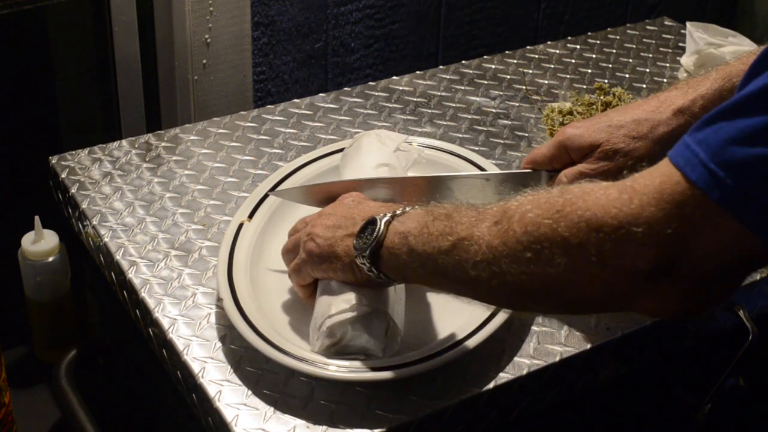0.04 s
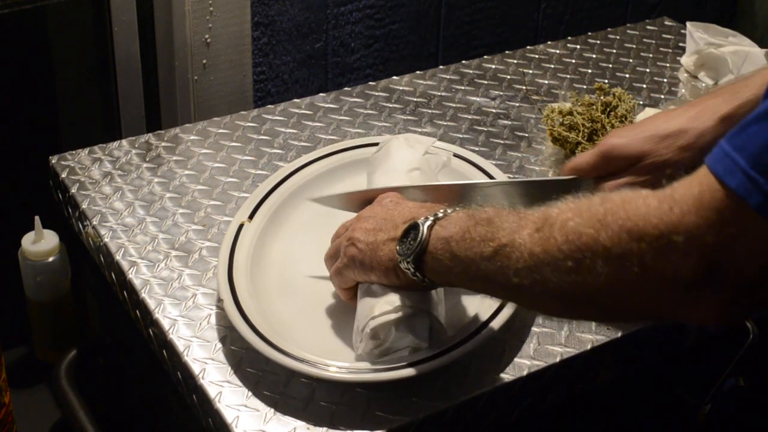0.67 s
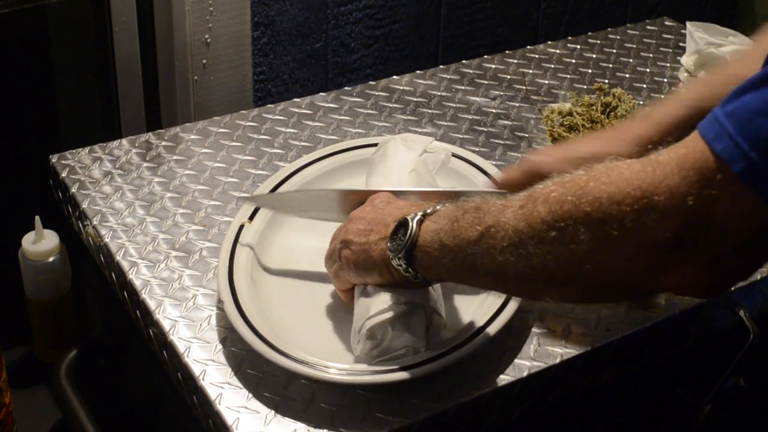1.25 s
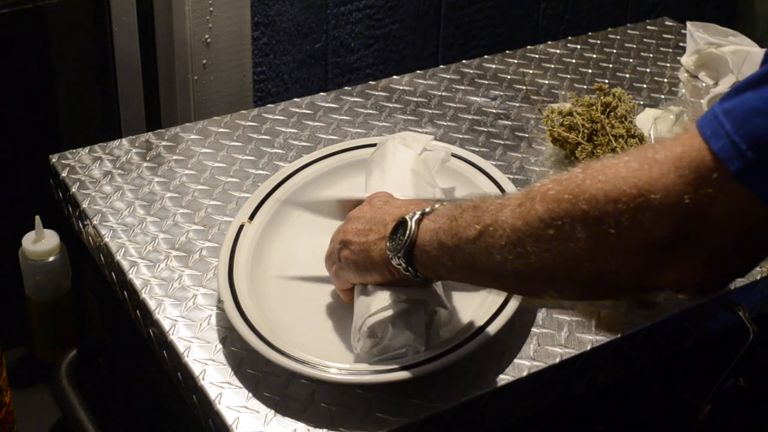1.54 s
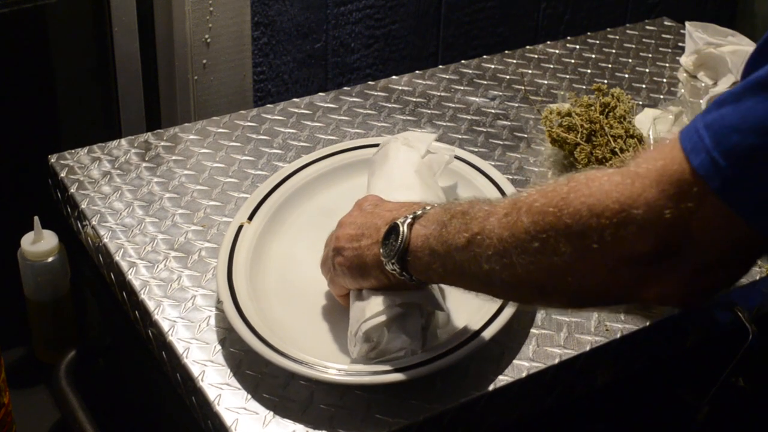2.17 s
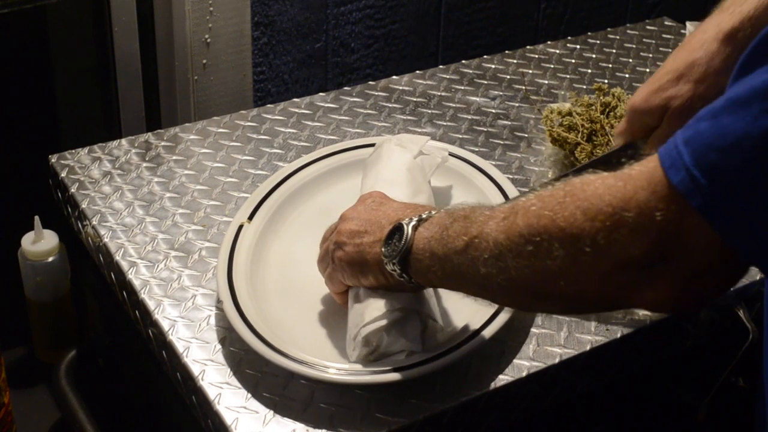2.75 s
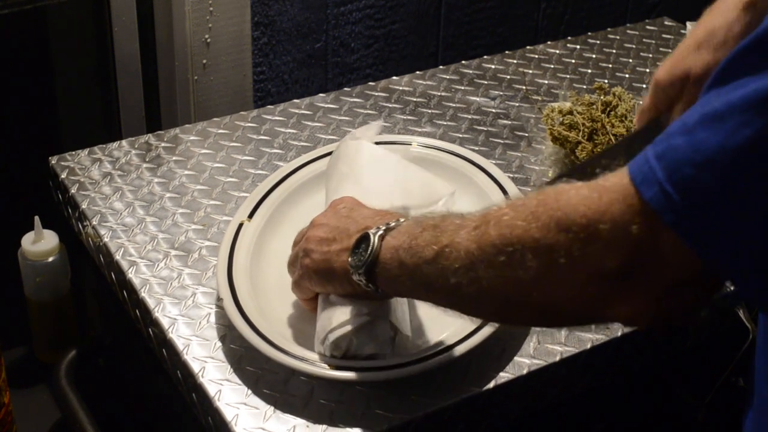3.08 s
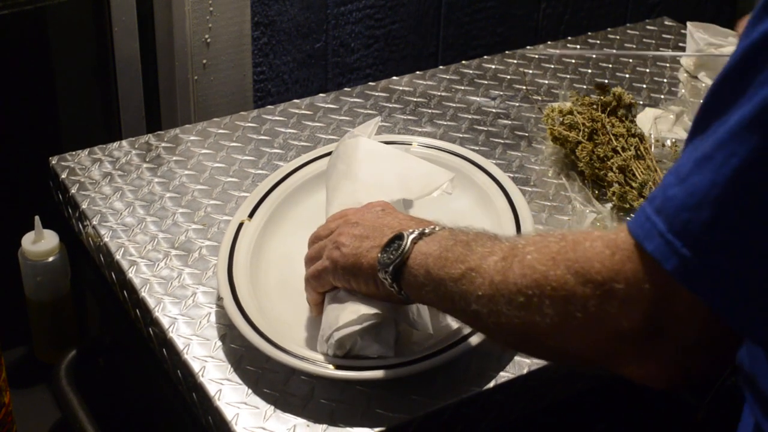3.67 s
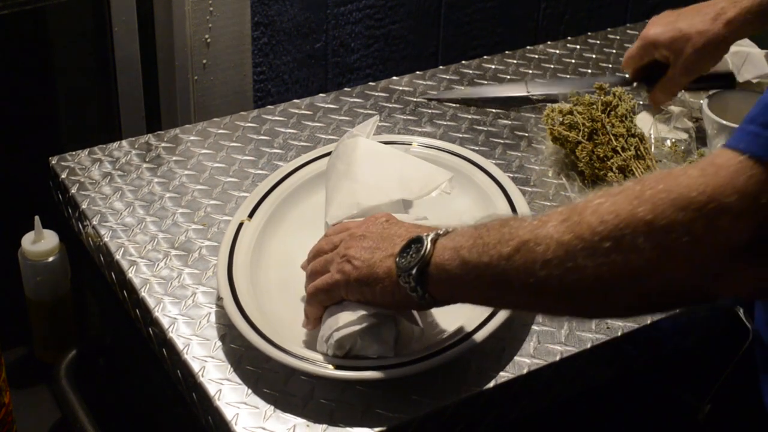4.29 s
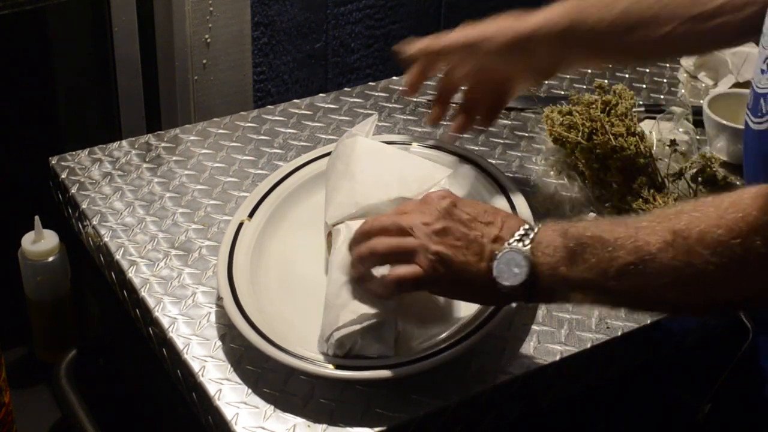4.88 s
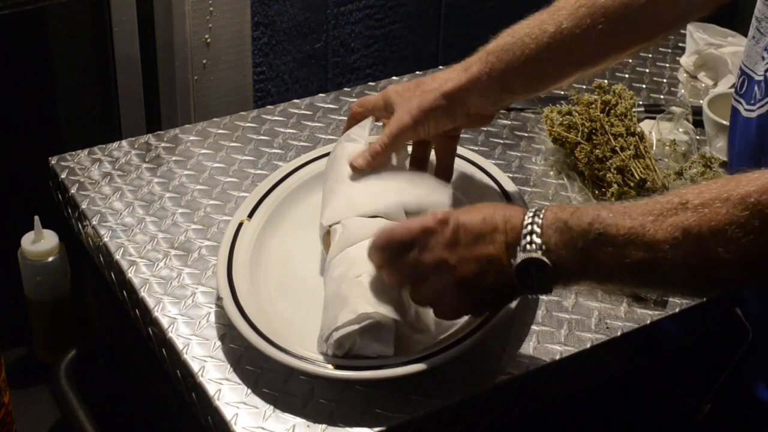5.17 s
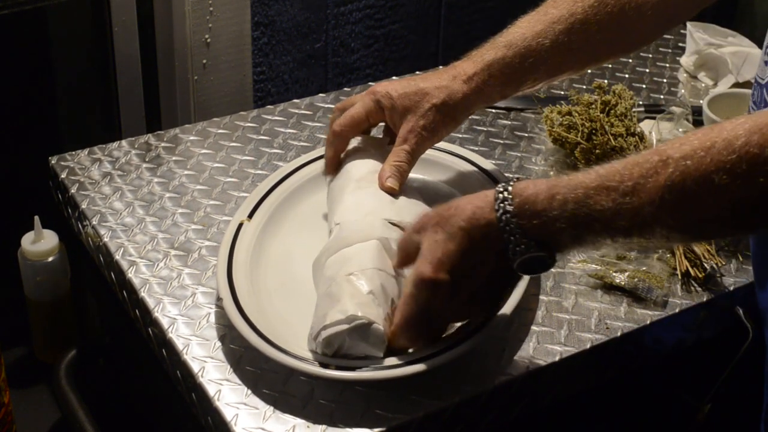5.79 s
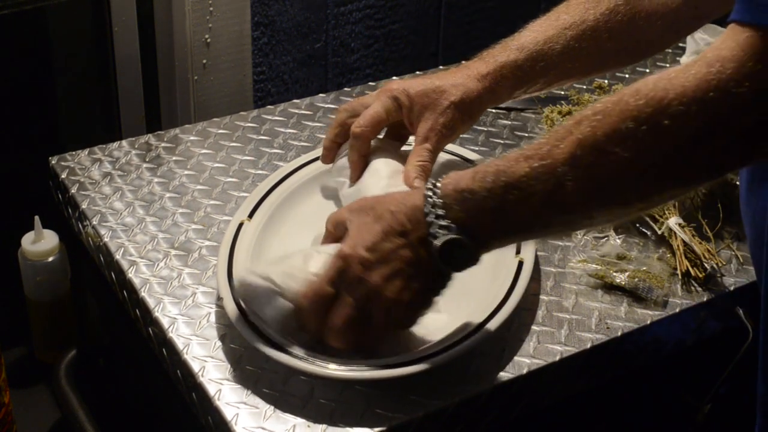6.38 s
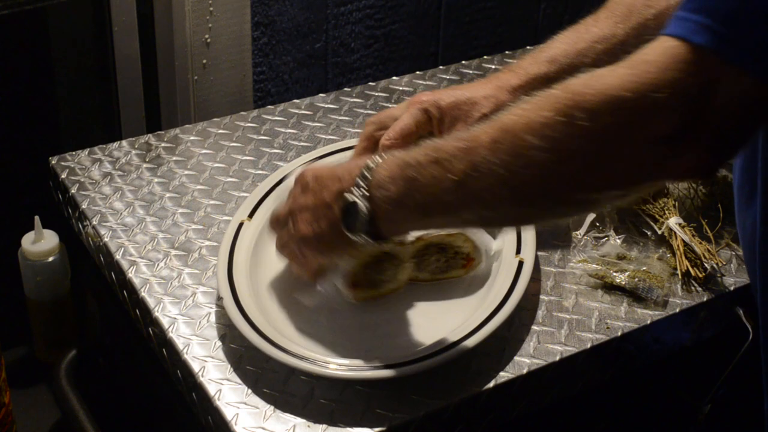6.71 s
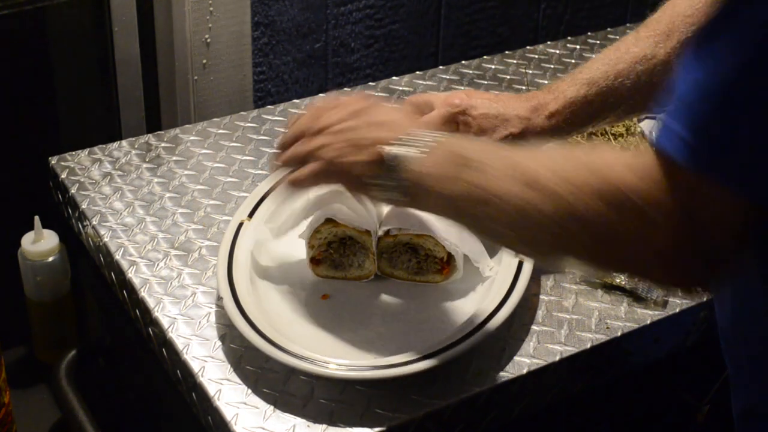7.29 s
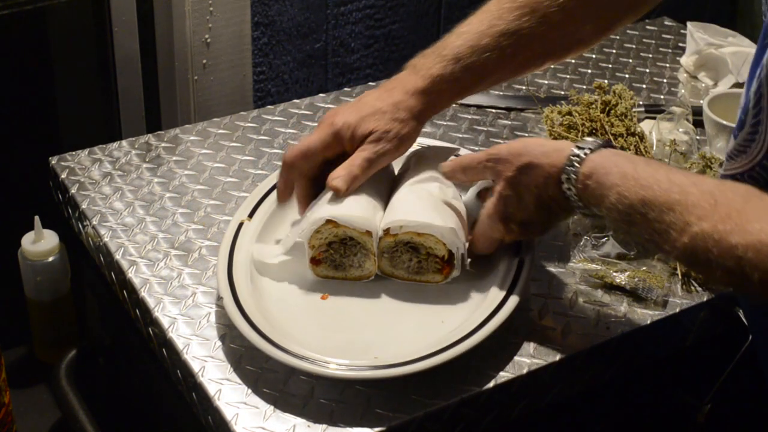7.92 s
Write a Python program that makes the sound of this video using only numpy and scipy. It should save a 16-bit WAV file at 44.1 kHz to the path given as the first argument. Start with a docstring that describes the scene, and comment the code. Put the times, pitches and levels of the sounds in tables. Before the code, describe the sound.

A faint ventilation hum fills a small kitchen throughout. From the start, a knife saws through a paper-wrapped sandwich in short, uneven strokes, close to the microphone; the paper crinkles, hisses, snaps and tears. At about 2.2 seconds the blade breaks through, hits the china and bangs the plate on a steel table, loud enough to distort and briefly duck the sound. More rustling strokes and light scrapes on the plate follow until about 3 seconds, then only faint paper ticks. At 4 seconds the knife is laid on the table, its handle knocking and its blade bouncing and ringing. At 4.5 seconds it drops flat with a loud, distorted metallic rattle. From there, hands turn the halves with soft, irregular crinkling and sliding. The plate rocks with one knock at about 6.3 seconds, and light rustling continues until the end, around 8 seconds.

```python
"""Over the hum of a small kitchen, a chef's knife saws through a paper-wrapped sandwich on a china plate:
the paper crinkles, hisses and tears. The knife breaks through, scrapes the china and bangs the plate on a
steel table, overloading the close microphone, which turns its gain down for a moment. The knife is laid
down, rings and drops flat with a rattle that overloads the microphone again. Then hands turn the
crackling halves, and the plate rocks once."""
import sys
import numpy as np
from scipy import signal
from scipy.fft import rfft, irfft, next_fast_len
from scipy.io import wavfile
from scipy.ndimage import uniform_filter1d, map_coordinates

SR = 44100
rng = np.random.default_rng(int(sys.argv[2]) if len(sys.argv) > 2 else 0)


def pcm_store(signal):
    """Save signal as 16-bit PCM."""
    levels = np.round(np.clip(np.atleast_2d(signal), -1, 1) * 32767)
    wavfile.write(sys.argv[1], SR, levels.astype(np.int16).T)


N = 355005
T = np.arange(N) / SR
ONE_SECOND = T[:SR]

# the ventilation's noise and the tones of the mains hum: (frequency [Hz], level [dB])
AIR_SPECTRUM = [(12, -44), (20, -9.5), (185, 3), (305, -4), (477, -2), (1580, -5.5), (2530, -5), (4930, -7),
                (5670, -10), (7480, -7.5), (9350, -16), (15400, -36)]
HUM_TONES = [(59.2, -73), (118.4, -72.5)]
# pushes of the knife through the wrap; hiss and rub are relative to the push's level:
# (start [s], end [s], level [dB], swell over the push [dB], hiss [dB], rub [dB])
KNIFE_STROKES = [(0.0, 0.03, -39.5, -0.5, -3.5, -5.5), (0.13, 0.53, -44.5, 1, -7, -12),
                 (0.61, 0.70, -45, -3, -6, -7), (0.70, 0.89, -41.5, 0.5, -1, -14),
                 (0.91, 0.95, -43, 3, -3, -8), (0.98, 1.10, -43, 1, 3, -12),
                 (1.17, 1.33, -44, 4.5, 0.5, -10), (1.36, 1.50, -41.5, 2.5, -1, -5),
                 (1.53, 1.68, -42.5, 3.5, 1, -9), (1.69, 1.88, -42.5, -3, 0, -11),
                 (1.92, 2.05, -39.5, 1.5, -2, -8), (2.10, 2.23, -29.5, 16, -3, -9.5),
                 (2.24, 2.47, -35, -18, -2, 2.5), (2.49, 2.54, -42.5, 2, -4, -0.5),
                 (2.57, 2.63, -34.5, 0.5, -12, -5.5), (2.66, 2.75, -34.5, -0.5, -6, -7),
                 (2.785, 2.81, -32, -5.5, -1.5, -12), (2.89, 2.93, -41, 3.5, -0.5, -5.5),
                 (2.95, 2.97, -35, -7, -1, -6), (2.99, 3.11, -45.5, -5.5, -6, -6)]
# tone colours of crinkling, sliding, rubbed bread and snapping creases: (frequency [Hz], level [dB])
CRINKLE_SPECTRUM = [(300, -38.5), (900, -12), (1500, -4), (2100, -0.5), (3000, 0), (4200, 0), (6000, 1),
                    (8000, -8.5), (11000, -32.5), (16000, -31.5)]
HISS_SPECTRUM = [(2000, -43.5), (5000, -18), (6500, 0), (7800, 1.5), (9500, -3), (11000, -9),
                 (13000, -18.5), (16000, -37)]
RUB_SPECTRUM = [(60, -30), (200, -11.5), (400, -4), (700, -4), (1000, -1), (1400, -4), (2500, -14.5),
                (8000, -49.5)]
SNAP_SPECTRUM = [(100, -28), (600, 8.5), (1800, 4.5), (4500, 2), (8000, 3), (11000, -7), (16000, -22.5)]
# paper and crust tear, and creases snap: (time [s], level [dB], centre frequency [Hz])
PAPER_TEARS = [(0.008, -18.5, 2800), (0.936, -9.5, 2660), (1.167, -12, 3200), (1.362, -10, 2800),
               (1.454, -8, 3870), (1.546, -8, 3230), (1.731, -11.5, 1010), (1.784, -14, 995),
               (4.989, -10, 3020), (5.573, -11, 2960), (6.564, -7, 5460), (6.733, -9, 3100),
               (6.812, -8, 2800)]
CREASE_SNAPS = [(0.2021, -9, 3080), (0.3918, -10.5, 3200), (0.5665, -18.5, 2820), (1.1681, -13, 3300),
                (1.992, 3.5, 2350), (2.5018, -5, 3000), (2.801, -4.5, 3640), (3.5015, -19.5, 4000),
                (3.694, -15, 4030), (4.449, -10.5, 5000), (4.829, -18, 2200), (4.929, -12, 3200),
                (5.2586, -8.5, 5200), (5.694, -3.5, 3300), (5.7583, -13, 3300), (5.9401, -5, 4200),
                (6.051, -8.5, 4600), (6.867, -6.5, 4900), (7.461, -12.5, 4260), (7.965, -8.5, 4250)]
# blows on the table: (time [s], level [dB], treble cut [Hz], bass cut [Hz], rattle relative to blow [dB],
# rattle length [s], damping by the hand [dB/s]); damping below zero counts as none
TABLE_BLOWS = [(1.993, -32, 4000, 712, -6, 0.0072, 199), (2.2276, -3, 5500, 743, 2, 0.026, 58),
               (2.256, -2, 5500, 792, -4, 0.058, 51), (4.020, -31, 8900, 300, 11, 0.18, -34),
               (4.021, -29, 523, 50, 13, 0.13, 5), (4.276, -33.5, 2200, 200, -1.5, 0.055, 0.5),
               (4.432, -33.5, 1484, 150, 8.5, 0.05, 0), (4.4932, -4, 8900, 282, -3, 0.15, 10)]
# the steel top's many crowded tones, heard as noise: (frequency [Hz], level [dB])
STEEL_SPECTRUM = [(50, -36.5), (100, -7.5), (150, -22), (250, -10.5), (400, 2.5), (530, -5), (900, 1),
                  (1400, 0.5), (2500, -5), (4200, -3), (6000, -2), (7500, -0.5), (10000, -11),
                  (15000, -36.5)]
# how long they ring, that is, take to fade by 60 dB: (frequency [Hz], ring time [s])
STEEL_DECAY = [(100, 1.0), (400, 0.69), (1000, 0.41), (3000, 0.35), (8000, 0.077), (15000, .14)]
# modes, the tones an object rings with when hit: (frequency [Hz], level [dB], ring time [s])
STEEL_MODES = [(105, -20, 1.1), (180, -18, .7), (222, -14, .8), (317, -14, .8), (393, -7, .7),
               (496, -6, .6), (614, -3.5, .55), (786, -3.5, .5), (862, -4, .45), (897, -4, .4),
               (931, -6, .4), (1062, -6, .45), (1273, -3, .45), (1403, -4, .4), (1533, -4, .4),
               (1960, -4, .4), (2023, -4, .35), (3564, -7, .34)]
CHINA_MODES = [(1227, -6, .12), (1400, -7, .1), (1518, -5, .11), (1879, 0, .15), (1970, -5, .16),
               (2196, -2, .14), (3316, -2, .14), (3499, -14, .22), (3892, -9, .12), (3989, -7, .15),
               (4129, -9, .16), (4221, -6, .18), (4565, -6, .17), (4727, -8, .13), (6067, -8, .14),
               (6520, -11, .1), (6654, -8, .11), (7250, -16, .1), (8027, -13, .1), (8300, -16, .1),
               (9500, -22, .1)]
BLADE_MODES = [(1066, -14, .25), (1335, -3, .3), (1400, -6, .25), (1701, -6, .25), (1809, -9, .25),
               (2020, -10, .2), (2347, -1, .26), (3180, -8, .18), (3397, -3, .2), (3720, -6, .12),
               (4011, -2, .14), (4651, -12, .15), (5060, -9, .35), (5243, -4, .16), (5792, -4, .11),
               (6449, -7, .11), (7004, -1, .12), (7176, -5, .13), (7924, -5, .12), (8629, -6, .125),
               (9421, -14, .15), (10120, -20, .2), (10680, -20, .11), (10950, -20, .12), (11820, -25, .12),
               (13690, -26, .11)]
HANDLE_MODES = [(335, -11, .3), (395, -10, .3), (440, -10, .25), (610, 0, .27), (1075, -10, .2),
                (1300, -8, .2)]
# the edge scrapes the plate: (middle time [s], half length [s], plate ring [dB], whisper [dB])
EDGE_SCRAPES = [(2.205, 0.022, -31, -34), (2.614, 0.031, -39, -38), (2.706, 0.017, -45, -57),
                (2.776, 0.02, -41, -46), (2.965, 0.0087, -35.5, -42)]
# the whisper at the cutting edge: (frequency [Hz], level [dB])
WHISPER_SPECTRUM = [(6000, -22), (8500, 4), (9800, 8.5), (12000, -3.5), (16000, -29)]
# steel meets china, the blade bounces, the handle lands: (time [s], level [dB], treble cut [Hz])
CHINA_HITS = [(2.2248, 5, 2400), (2.3945, -22, 4930), (2.3985, -14.5, 11000), (3.145, -38.5, 1890)]
BLADE_HITS = [(4.020, -32, 14000), (4.068, -32.5, 12000), (4.105, -48, 12000), (4.170, -31.5, 12000),
              (4.272, -30.5, 15000), (4.277, -31, 15000), (4.4925, -23.5, 15100), (4.52, -29, 11000),
              (4.557, -21.5, 11000), (4.61, -21, 11000), (4.655, -26.5, 11000)]
HANDLE_HITS = [(4.021, -28.3, 2500)]
# hands hold, shift and turn the halves; hiss and rub are relative to the move's level:
# (start [s], end [s], level [dB], swell over the move [dB], hiss [dB], rub [dB])
HAND_MOVES = [(3.13, 3.27, -58.5, 0, -3, 4), (3.31, 3.52, -53.5, -14, -6, -3.5),
              (3.63, 3.66, -55, 0, -7, 0), (3.70, 3.72, -50, -6, -3, -1.5), (3.90, 3.95, -50.5, 4, -9, 0.5),
              (4.44, 4.80, -46.5, -16, -3, -6), (4.81, 5.08, -46, -4, -5, -1),
              (5.165, 5.29, -41.5, 4.5, -4, -6), (5.30, 5.43, -43.5, 3, -6, -4.5),
              (5.46, 5.60, -38, -1.5, -7.5, -11), (5.64, 5.70, -34, -4.5, -7, -11.5),
              (5.74, 5.95, -41, -1.5, -5, -9.5), (5.97, 6.23, -45, 2.5, -7, -10),
              (6.24, 6.52, -40, -0.5, -4, -12), (6.55, 6.67, -45, 6, -1.5, -6),
              (6.72, 6.85, -42, -6, -5.5, -5), (6.89, 7.08, -45, -4.5, -5.5, -7.5),
              (7.12, 7.26, -48, -2.5, -3, -7), (7.31, 7.33, -50, -1, 2.5, -6),
              (7.38, 7.41, -49.5, -10, -2, -5.5), (7.45, 7.60, -53.5, -4, -7.5, -6),
              (7.69, 7.78, -50.5, -13.5, -4, -4.5), (7.82, 7.92, -41.5, -0.5, -2.5, -11),
              (7.97, 8.05, -40, 6, -4.5, -12)]
# the plate rocks back onto its foot: (time [s], level [dB])
PLATE_KNOCKS = [(6.2861, -20), (6.309, -37)]
# the tone colour of that knock: (frequency [Hz], level [dB])
KNOCK_SPECTRUM = [(100, -24), (220, -22), (400, 1.5), (560, -5), (950, 8.5), (1130, 2), (1350, 5.5),
                  (1950, 4.5), (2300, -7), (3200, -6), (4200, -25), (10000, -55)]
# how long the knock and the kitchen's echo last: (frequency [Hz], ring time [s])
KNOCK_DECAY = [(350, 0.74), (900, 0.39), (2000, 0.29), (6000, 0.2)]
KITCHEN_DECAY = [(200, 0.1), (2000, 0.27), (10000, 0.14)]
# narrow dips caused by the microphone's housing: (frequency [Hz], half width [Hz], gain [dB])
HOUSING_DIPS = [(5730, 230, -10.5), (6776, 60, -7)]


def amp(db):
    """Turn decibels into a factor to multiply by."""
    return 10 ** (np.asarray(db) / 20)


def unit(x):
    """Scale a sound to an average (rms) level of 1."""
    return x / np.sqrt(np.mean(x ** 2) + 1e-20)


def unit_onset(x):
    """Scale a ring so that its first 20 ms have an average (rms) level of 1."""
    return x / np.std(x[:SR // 50])


def along(points, hz):
    """Read between (frequency, value) points on a logarithmic frequency axis."""
    frequencies, values = np.transpose(points)
    return np.interp(np.log(hz + 1), np.log(frequencies + 1), values)


def wobble(rate):
    """A smooth random curve through `rate` points a second."""
    return map_coordinates(rng.standard_normal(int(N * rate / SR) + 4), [T * rate])


def shaped(x, gain):
    """Filter x by gain(frequency), so that nothing sounds before its cause (minimum phase)."""
    size = 2 * next_fast_len(len(x) // 2 + 4096)
    gains = np.maximum(gain(np.fft.rfftfreq(size, 1 / SR)), 1e-6)
    cepstrum = irfft(np.log(gains), size)
    cepstrum[1:size // 2] *= 2
    cepstrum[size // 2 + 1:] = 0
    return irfft(rfft(x, size) * np.exp(rfft(cepstrum)), size)[:len(x)]


def coloured(x, spectrum):
    """Give x the tone colour of a (frequency, level) table."""
    return shaped(x, lambda hz: amp(along(spectrum, hz)))


def soft(hz, cut_hz):
    """A softer contact passes less treble."""
    return 1 / np.sqrt(1 + (hz / cut_hz) ** 4)


def dying_noise(decay):
    """One second of noise in which each frequency dies at its own speed."""
    hz, t, bands = signal.stft(rng.standard_normal(SR), SR, nperseg=256)
    fade = amp(-60 * t / along(decay, hz)[:, None])
    return signal.istft(bands * fade, SR, nperseg=256)[1][:SR]


def ringing(modes, detune, t):
    """Fading tones; each is a close cluster of three that beat against each other."""
    hz, db, ring_s = np.transpose(modes)[:, :, None]
    ring = 0
    for side in (-1, 0, 1):
        detuned_hz = hz * (1 + side * detune * rng.uniform(0.5, 1, hz.shape))
        cycles = detuned_hz * t + rng.random(hz.shape)
        ring = ring + np.sin(2 * np.pi * cycles) / (1 + abs(side) / 2)
    return np.sum(amp(db - 60 * t / ring_s) * ring, axis=0)


def add(track, start_s, x):
    """Mix x into the track at the given time."""
    part = track[round(start_s * SR):][:len(x)]
    part += x[:len(part)]


def room_tone(air_db):
    """Ventilation and a faint mains hum."""
    hum = sum(amp(db) * np.sqrt(2) * np.sin(2 * np.pi * hz * T) for hz, db in HUM_TONES)
    return hum + amp(air_db) * unit(coloured(rng.standard_normal(N), AIR_SPECTRUM))


def fibres(slips_per_s, spread_db, slip_share):
    """Tiny slips of paper fibres, of widely varying size, over smooth friction."""
    slipping = rng.random(N) < slips_per_s / SR
    sizes = amp(spread_db * np.clip(rng.standard_normal(N), -2.5, 2.5))
    slips = unit(slipping * sizes * rng.choice([-1, 1], N))
    return np.sqrt(slip_share) * slips + np.sqrt(1 - slip_share) * rng.standard_normal(N)


def pushes(rows, attack_s, release_s, hiss_rise_db, rub_drop_db):
    """Loudness of crinkle, hiss and rub: each push sets in, moves fastest halfway and lets go."""
    gains = np.zeros((3, N))
    for start, end, db, swell_db, hiss_db, rub_db in rows:
        span = slice(max(round((start - 0.1) * SR), 0), round((end + 0.4) * SR))
        t = T[span]
        progress = np.clip((t - start) / (end - start), 0, 1)
        speed = np.sin(np.pi * progress) - 2 / np.pi  # above or below the average speed
        set_in = (1 + np.tanh((t - start) / attack_s)) / 2
        let_go = np.exp(-np.maximum(t - end, 0) / release_s)
        level = set_in * let_go * amp(db + swell_db * (progress - 0.5))
        balance = amp([np.zeros_like(t), hiss_db + hiss_rise_db * speed, rub_db - rub_drop_db * speed])
        gains[:, span] += (level * balance) ** 2
    return np.sqrt(gains)


def paper(gains, grain, flutter_db, crinkle_db, hiss_db, rub_db):
    """Pushes drive the fibres: the sheet crinkles, fast sliding hisses, the bread beneath rubs dully."""
    crinkle_gain, hiss_gain, rub_gain = gains
    drive = grain * amp(flutter_db * wobble(70))  # the paper catches and lets go
    crinkle = amp(crinkle_db) * unit(coloured(drive, CRINKLE_SPECTRUM))
    hiss = amp(hiss_db) * unit(coloured(np.roll(drive, SR // 700), HISS_SPECTRUM))
    rub = amp(rub_db) * unit(coloured(fibres(810, 4.4, 0.3), RUB_SPECTRUM))
    return crinkle_gain * crinkle + hiss_gain * hiss + rub_gain * rub


def sawing():
    """The blade rasps through the wrap; where it is fastest it hisses more and rubs less."""
    gains = pushes(KNIFE_STROKES, attack_s=0.014, release_s=0.046, hiss_rise_db=3, rub_drop_db=1.5)
    grain = fibres(slips_per_s=2500, spread_db=5.2, slip_share=0.52)
    return paper(gains, grain, flutter_db=1.5, crinkle_db=1, hiss_db=-1, rub_db=0)


def paper_bursts(events, rise_s, decay_s, sharpness, crumple_s, crumple_db):
    """A patch of paper gives way in a burst, coloured by its size; its neighbours crumple after it."""
    out, t = np.zeros(N), T[:SR // 8]
    for start, db, centre_hz in events:
        fade = np.exp(-t / decay_s) + amp(crumple_db) * np.exp(-t / crumple_s)
        noise = rng.standard_normal(len(t)) * fade * (1 - np.exp(-t / rise_s))
        patch = lambda hz: 1 / np.hypot(1, sharpness * (hz / centre_hz - centre_hz / (hz + 1)))
        burst = shaped(noise, lambda hz: amp(along(SNAP_SPECTRUM, hz)) * patch(hz))
        add(out, start, amp(db) * burst / np.linalg.norm(burst))
    return out


def tearing():
    """Paper and crust tear or crush in short bursts with a soft start."""
    return amp(1.5) * paper_bursts(PAPER_TEARS, rise_s=0.015, decay_s=0.012, sharpness=0.76,
                                   crumple_s=0.0084, crumple_db=-4)


def snapping(ticks_per_s):
    """Creases buckle with a sharp snap, and the wrap settles in faint random ticks."""
    draws = rng.random((round(ticks_per_s * N / SR), 3))
    ticks = [(when * N / SR, -25 + 6 * size, 4400 * 2 ** (pitch - 0.5)) for when, size, pitch in draws]
    return paper_bursts(CREASE_SNAPS + ticks, rise_s=0.00005, decay_s=0.0006, sharpness=1.1,
                        crumple_s=0.007, crumple_db=-13.5)


def table_bangs(modes_db, chatter_per_s):
    """Each blow rings the steel top; what lies on it chatters for a moment and keeps it ringing."""
    out = np.zeros(N)
    for start, db, treble_hz, bass_hz, rattle_db, rattle_s, damping in TABLE_BLOWS:
        wash = unit_onset(coloured(dying_noise(STEEL_DECAY), STEEL_SPECTRUM))
        tones = unit_onset(ringing(STEEL_MODES, detune=0.0062, t=ONE_SECOND))
        steel = (wash + amp(modes_db) * tones) * amp(-max(damping, 0) * ONE_SECOND)
        settling = np.exp(-np.minimum(ONE_SECOND / rattle_s, 10) ** 2.8)
        contacts = (rng.random(SR) < chatter_per_s / SR) * rng.standard_normal(SR) * settling
        chatter = signal.fftconvolve(contacts / (np.linalg.norm(contacts) + 1e-9), steel)[:SR]
        band = lambda hz: soft(hz, treble_hz) * hz / np.hypot(hz, bass_hz)
        add(out, start, amp(db) * shaped(steel + amp(rattle_db) * chatter, band))
    return out


def edge_scraping():
    """The edge scrapes over the china: the plate sings faintly and the cut paper whispers."""
    high_modes = [mode for mode in CHINA_MODES if mode[0] > 3000]  # a light edge wakes only these
    friction = fibres(1700, 5, 0.46)
    ring = ringing(high_modes, detune=0.019, t=T[:SR // 3])
    plate = unit(signal.fftconvolve(friction, ring)[:N])
    whisper = unit(coloured(fibres(3000, 6, 0.4), WHISPER_SPECTRUM))
    out = np.zeros(N)
    for middle_s, half_s, ring_db, whisper_db in EDGE_SCRAPES:
        swell = np.exp(-((T - middle_s) / half_s) ** 2 / 2)
        out += swell * (amp(ring_db) * plate + amp(whisper_db) * whisper)
    return out


def strikes(hits, modes, detune, buzz_db, buzz_s, click_db, bass_hz):
    """A hard contact clicks, and the two surfaces buzz against each other while the object rings."""
    out, t = np.zeros(N), T[:SR // 3]
    for start, db, treble_hz in hits:
        buzz = rng.standard_normal(len(t)) * np.exp(-t / buzz_s)
        force = amp(buzz_db) * buzz / np.linalg.norm(buzz)
        force[0] = 1  # the hit itself
        ring = unit_onset(signal.fftconvolve(force, ringing(modes, detune, t))[:len(t)])
        click = unit_onset(coloured(rng.standard_normal(len(t)) * np.exp(-t / 0.013), CRINKLE_SPECTRUM))
        band = lambda hz: soft(hz, treble_hz) * soft(bass_hz, hz + 1)  # small things give off no bass
        add(out, start, amp(db) * shaped(ring + amp(click_db) * click, band))
    return out


def china_clinks():
    """Steel meets china, and the plate rings briefly."""
    return strikes(CHINA_HITS, CHINA_MODES, detune=0.014, buzz_db=-18.5, buzz_s=0.018,
                   click_db=-10, bass_hz=900)


def turning_halves():
    """Hands slide over the wrap and crinkle it, with fewer fibre slips than the blade makes."""
    gains = pushes(HAND_MOVES, attack_s=0.013, release_s=0.043, hiss_rise_db=1, rub_drop_db=0)
    grain = fibres(slips_per_s=700, spread_db=4.4, slip_share=0.34)
    return paper(gains, grain, flutter_db=1.64, crinkle_db=1.5, hiss_db=-1, rub_db=-1)


def blade_bounces():
    """The blade lands, bounces and rings brightly."""
    return strikes(BLADE_HITS, BLADE_MODES, detune=0.012, buzz_db=-2, buzz_s=0.006,
                   click_db=-7, bass_hz=700)


def handle_knock():
    """The handle knocks hollowly on the table."""
    return strikes(HANDLE_HITS, HANDLE_MODES, detune=0.015, buzz_db=-21, buzz_s=0.008,
                   click_db=-29, bass_hz=150)


def plate_rocking():
    """The loaded plate tips and knocks on the table, damped by the hands."""
    out = np.zeros(N)
    for start, db in PLATE_KNOCKS:
        add(out, start, amp(db) * unit_onset(coloured(dying_noise(KNOCK_DECAY), KNOCK_SPECTRUM)))
    return out


def kitchen(x, echo_db):
    """Hard walls close by add a short echo that starts 4 ms late."""
    tail = np.pad(dying_noise(KITCHEN_DECAY), (SR // 250, 0))
    return x + amp(echo_db) * signal.fftconvolve(x, tail / np.linalg.norm(tail))[:N]


def scene():
    """Paper, steel and china in the kitchen, as one channel."""
    background = room_tone(air_db=-55)
    sounds = sawing() + tearing() + snapping(ticks_per_s=4)
    sounds += table_bangs(modes_db=-8.5, chatter_per_s=650) + edge_scraping() + china_clinks()
    sounds += turning_halves() + blade_bounces() + handle_knock() + plate_rocking()
    return (background + kitchen(sounds, echo_db=-13.5))[None]


def gain_control(x, threshold_db, attack_s, release_db_per_s):
    """Loud sound pulls the gain down within milliseconds; it then creeps back."""
    power = signal.lfilter(np.ones(128) / 128, 1, x ** 2)
    excess_db = np.maximum(10 * np.log10(np.abs(power) + 1e-12) - threshold_db, 0)
    recovery_db = release_db_per_s * T
    cut_db = np.maximum.accumulate(excess_db + recovery_db) - recovery_db
    smoothing = np.exp(-1 / (attack_s * SR))
    return x * amp(-signal.lfilter([1 - smoothing], [1, -smoothing], cut_db))


def overload(x, skew):
    """Peaks too big for the input are cut flat and pull it to one side, which adds a low thud."""
    excess = uniform_filter1d(np.maximum(np.abs(x) - 1, 0), size=SR // 1000)
    return np.clip(x - skew * np.tanh(10 * excess), -1, 1)


def record(dry):
    """The microphone colours the sound, turns down and clips hard blows, and trims bass and treble."""
    dips_db = lambda hz: sum(db / (1 + ((hz - centre) / width) ** 2) for centre, width, db in HOUSING_DIPS)
    x = shaped(dry[0], lambda hz: amp(dips_db(hz)))
    x = gain_control(x, threshold_db=-7, attack_s=0.0042, release_db_per_s=75)
    x = overload(x, skew=0.03)
    x = signal.lfilter(*signal.butter(1, 39.8, "high", fs=SR), x)  # the input drains the deepest bass
    treble_cut = signal.ellip(12, 0.2, 80, 15700, fs=SR, output="sos")
    return signal.sosfilt(treble_cut, x)[None]


dry = scene()
out = record(dry)
pcm_store(out)
```